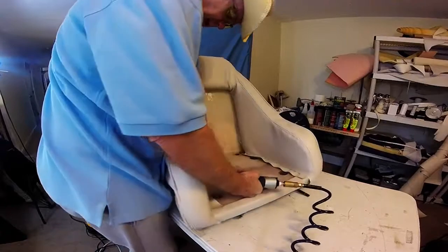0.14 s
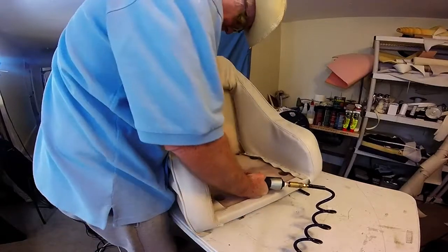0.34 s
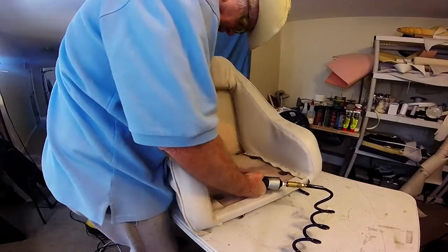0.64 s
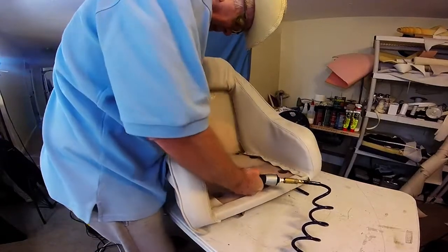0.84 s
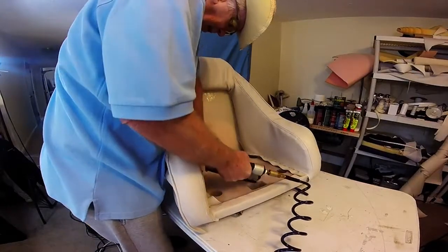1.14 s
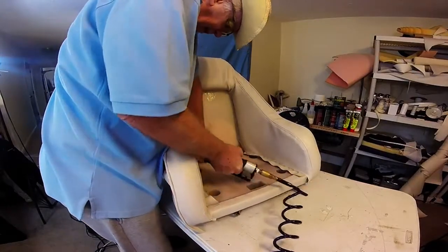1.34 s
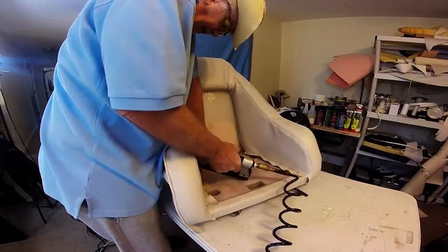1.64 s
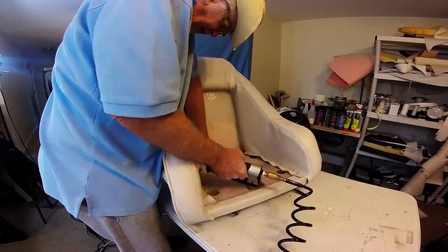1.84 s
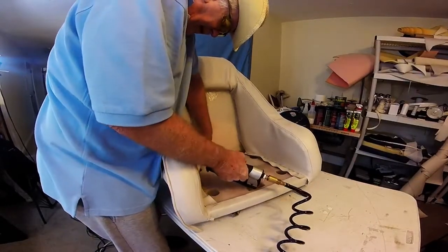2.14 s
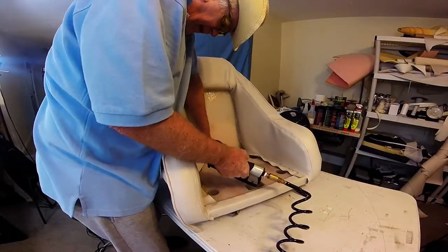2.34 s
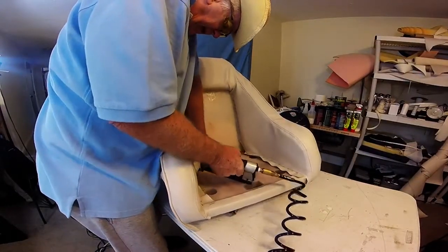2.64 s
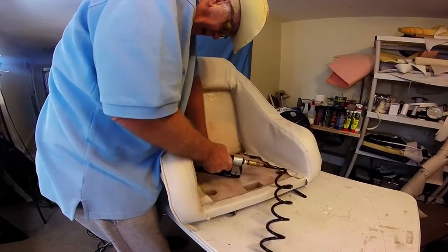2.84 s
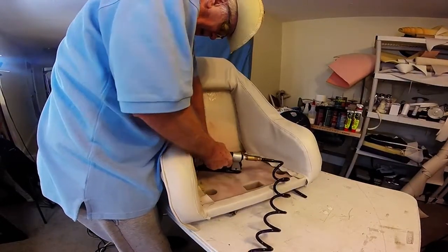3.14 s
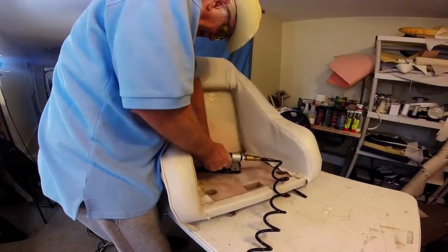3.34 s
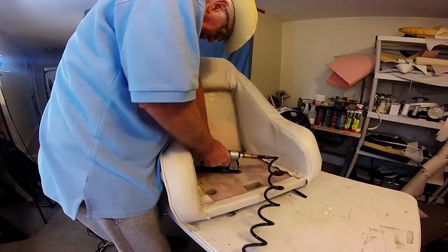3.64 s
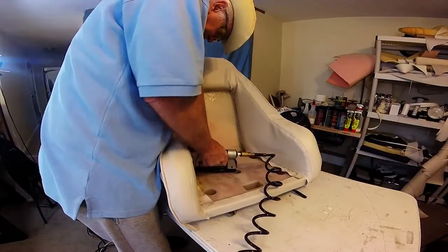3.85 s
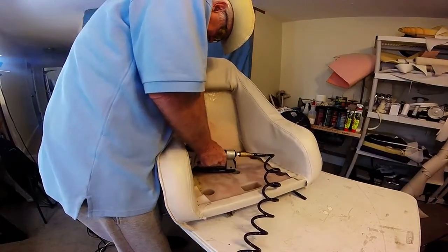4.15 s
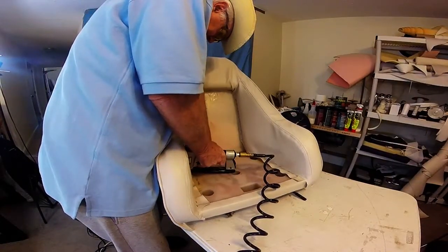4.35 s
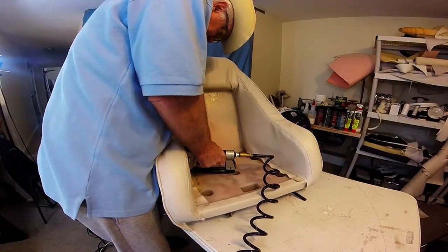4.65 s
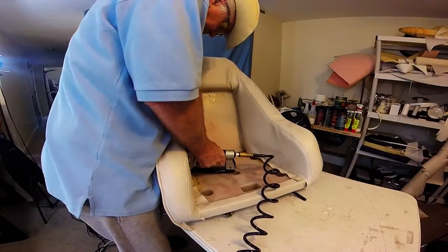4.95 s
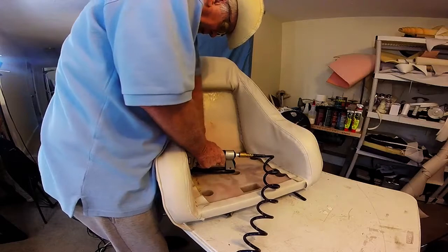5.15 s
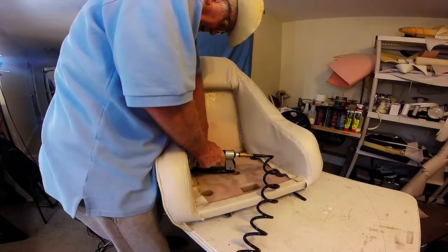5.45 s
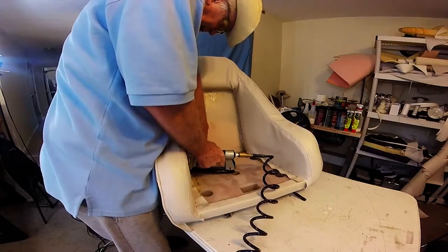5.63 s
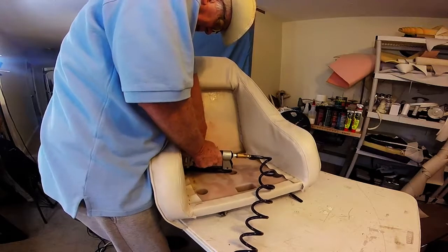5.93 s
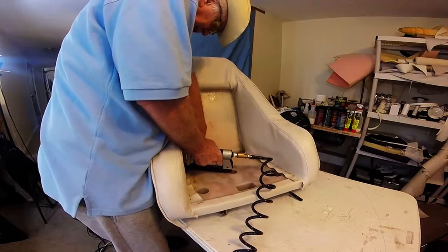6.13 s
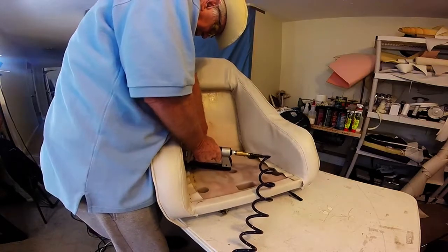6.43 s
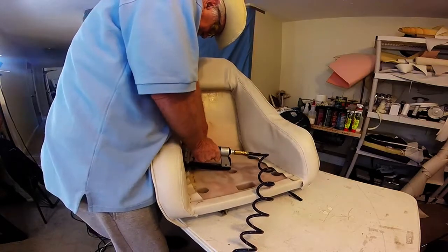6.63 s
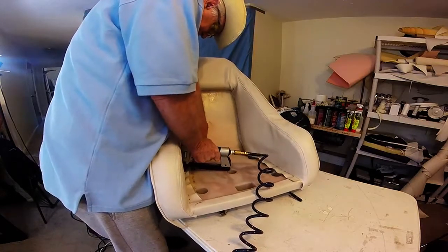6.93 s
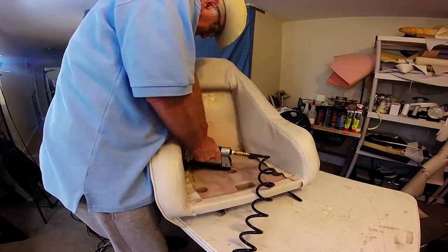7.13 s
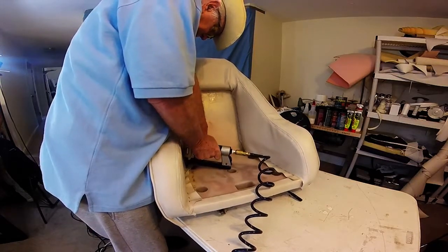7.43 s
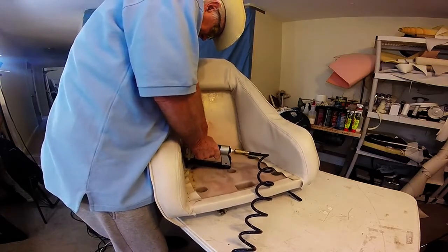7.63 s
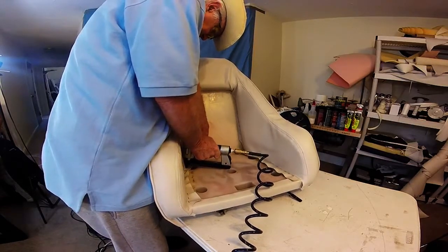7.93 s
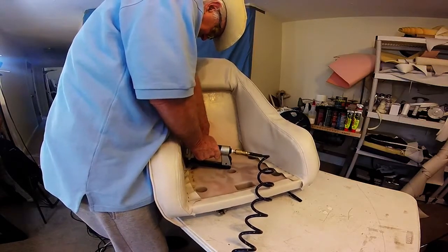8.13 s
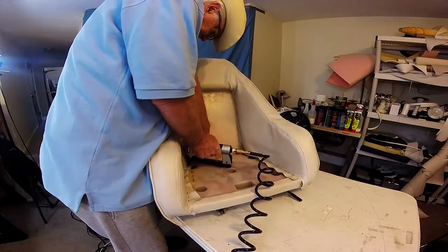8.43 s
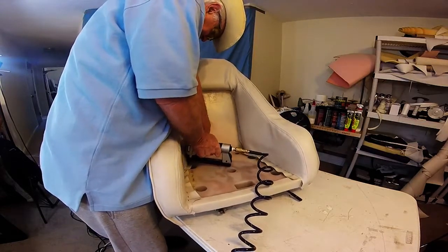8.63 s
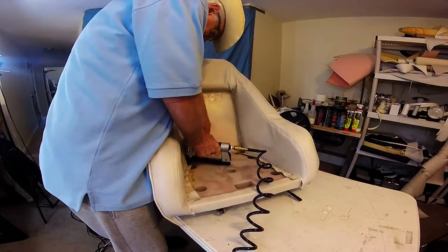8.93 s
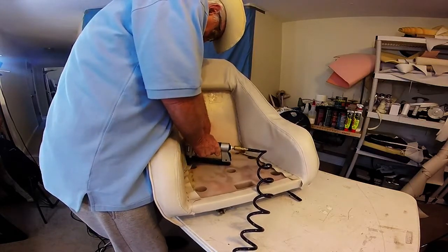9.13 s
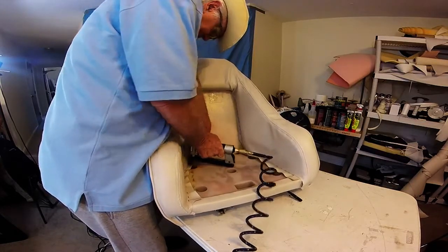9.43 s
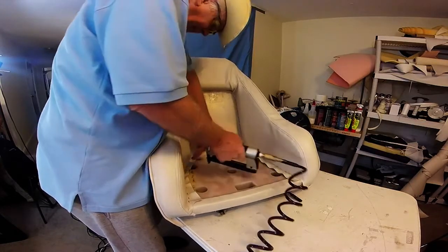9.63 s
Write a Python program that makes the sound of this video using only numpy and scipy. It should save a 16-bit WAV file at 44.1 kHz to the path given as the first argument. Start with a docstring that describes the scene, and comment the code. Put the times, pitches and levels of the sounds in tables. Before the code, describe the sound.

A seat is shoved and bumped on a workbench, then an air stapler fires four hard shots, each followed by a sharp exhaust puff.

```python
"""Small workshop: an air stapler fastens vinyl to a hard plastic seat base.
The seat is shoved into place (stick-slip shudder and scrape); tool and hands bump, clack and rub (struck modes, noise).
Four staples follow: each a hiss at the trigger valve, a driver bang (noise bursts and modes) and, on release,
a puff of exhaust. Random echoes form the room; the overall level drops after each bang and creeps back."""
import sys
import numpy as np
from scipy import signal
from scipy.fft import rfft, irfft
from scipy.io import wavfile
from scipy.ndimage import uniform_filter1d, minimum_filter1d

SR = 44100
rng = np.random.default_rng(int(sys.argv[2]) if len(sys.argv) > 2 else 0)


def unload_audio(sound):
    """Save the sound as a 16-bit wav file, at the path given as the first command line argument."""
    columns = np.transpose(np.atleast_2d(sound))
    # keep every value between -1 and 1, then stretch to whole-number steps
    steps = np.round(np.clip(columns, -1, 1) * 32767)
    wavfile.write(sys.argv[1], SR, steps.astype(np.int16))


N = 431289
TIME = np.arange(N) / SR
AGE = TIME[:SR // 2]  # time since a hit [s]

# All levels are relative: later gains add to them.
# room air: (frequency [Hz], density [dB])
AIR_COLOUR = [(12, -21.5), (20, 7), (87, -8), (124, -23.5), (169, -11), (256, -22), (328, -20.5),
              (445, -20.5), (571, -24.5), (656, -27.5), (841, -25), (1170, -29), (1310, -29.5),
              (12700, -50), (15000, -66)]
# bench rumble under the leaning worker: (frequency [Hz], density [dB])
LEANING_COLOUR = [(15, -20), (35, 1.5), (55, -3.5), (95, -2), (140, -10.5), (300, -34), (2000, -69.5)]
# room decay: (frequency [Hz], t60 [s])
ROOM_T60_S = [(100, 0.16), (400, 0.28), (1000, 0.3147), (3000, 0.2528), (7000, 0.2738), (15000, 0.13)]
# room echo: (frequency [Hz], level [dB])
ROOM_ECHO_DB = [(60, -4.5), (200, -3.5), (500, -8), (1000, -10), (4000, -7.5), (15000, -7.5)]
# the hands work down inside the padded seat, so less of their sound reaches the walls
HANDLING_ECHO_DB, RIM_ECHO_DB = -2.5, -8

# seat shoved along the bench: (start [s], rise [s], shudder [dB], scrape [dB], initial slip rate [1/s])
SHOVES = [(0, 0.026, -24, -31.5, 96), (.29, 0.017, -24, -46, 72)]
SHOVE_S, SLIP_SLOWING_PER_S = 0.38, 0.91
SHUDDER_FADE_DB_PER_S, SCRAPE_FADE_DB_PER_S = 95, 59
# seat scrape and vinyl drag: (frequency [Hz], density [dB])
DRAG_COLOUR = [(120, -37), (200, -7), (329, 3.5), (440, -10.5), (487, 1), (641, -2.5), (951, -10),
               (1620, -30), (12000, -51.5), (15600, -78.5), (22000, -120)]

# how hard the hands work: (time [s], level [dB])
EFFORT = [(0, -54), (2.9, -47), (3.85, -54.5), (4.1, -57), (5.6, -54), (7.5, -54), (8.3, -62.5),
          (9.78, -56)]
# sleeve strokes over the vinyl: (middle [s], length [s], level [dB])
STROKES = [(0.127, 0.37, -45), (0.51, 0.072, -52), (0.804, 0.065, -46), (1.317, 0.14, -54),
           (2.148, 0.085, -62.5), (2.39, 0.12, -56), (2.64, 0.23, -53), (2.805, 0.12, -46),
           (2.87, 0.086, -45), (5.215, 0.24, -46), (6.35, 0.044, -63), (5.843, 0.28, -43),
           (7.748, 0.11, -47), (8.76, 0.18, -55)]
# cloth on vinyl: (frequency [Hz], density [dB])
RUSTLE_COLOUR = [(71, -33), (120, -3), (169, 1.5), (203, -5), (357, -10.5), (446, -11.5), (557, -14.5),
                 (852, -12.5), (1690, -34.5), (3170, -34), (9240, -49), (12500, -54), (15000, -59)]
NUDGES_PER_S = 4.6
# popping fold: (frequency [Hz], density [dB])
CREASE_COLOUR = [(150, -10), (500, -1.5), (1000, 1), (1600, -11.5), (3000, -14.5), (6000, -25),
                 (15000, -42)]
# tool scuffs over taut vinyl: (middle [s], length [s], level [dB])
SCUFFS = [(0.1, 0.23, -59), (1.18, .25, -62.5), (1.462, .42, -63.5), (2.698, 0.37, -65.5),
          (3.232, 0.056, -55), (7.656, 0.05, -59.5), (8.262, .07, -55.5)]
# scuff: (frequency [Hz], density [dB])
SCUFF_COLOUR = [(300, -13), (1000, -2), (2500, 6), (4200, -2), (6000, -2), (10000, -10.5), (13000, -26),
                (16000, -30)]
# ticks of vinyl pulled taut: (time [s], level [dB])
TICKS = [(0.618, -53.5), (0.989, -51.5), (2.242, -57), (3.878, -56), (3.998, -60.5), (6.024, -52.5),
         (6.44, -57), (6.579, -57.5), (7.648, -56.5)]
# dry tick or click: (frequency [Hz], density [dB])
TICK_COLOUR = [(300, -21.5), (1200, 2.5), (3200, 6), (5000, 0), (9000, -9), (13000, -9.5), (16000, -27)]

# tool and hands bump the seat: (time [s], padded thud [dB], shell knock [dB])
BUMPS = [(0.155, -31.5, -35.5), (0.29, -25.5, -39), (0.319, -31, -47), (0.508, -38, -46), (0.622, -41, -50),
         (0.728, -38, -54), (0.8, -48, -49), (0.99, -31.5, -38), (1.069, -17, -39), (1.135, -32, -53),
         (1.344, -42, -54), (1.525, -48, -53), (1.852, -21.5, -38), (1.873, -28, -37), (1.888, -35, -37.5),
         (1.977, -31, -44), (2.043, -42, -68), (2.168, -41, -50), (2.241, -47, -42), (2.479, -20.5, -38.5),
         (2.761, -32, -45), (2.803, -48, -36.5), (2.849, -33, -35.5), (3.001, -41, -51),
         (3.096, -23.5, -34.5), (3.169, -26, -44), (3.735, -39, -30.5), (3.772, -41, -38), (4.13, -49, -49),
         (4.192, -47, -46.5), (4.251, -37.5, -62), (5.237, -41, -62), (5.959, -44, -45), (6.024, -43, -43),
         (6.106, -39, -55), (6.2, -42, -58.5), (6.339, -42, -65), (6.48, -44.5, -64), (6.6, -44, -55),
         (6.722, -43, -60), (7.337, -27.5, -50), (7.651, -31.5, -59), (8.027, -28.5, -31.5),
         (8.393, -30.5, -46), (8.745, -40, -61), (9.656, -34, -54.5), (9.736, -53, -43)]
SETTLE_S, SETTLE_DB = 0.019, -11  # the seat drops back after a bump
# bump through the padding: (frequency [Hz], density [dB])
THUD_COLOUR = [(30, -18), (80, -7), (160, 0), (260, -4), (380, -17), (700, -32), (2000, -58), (8000, -85)]
# short damped tap on the shell: (frequency [Hz], density [dB])
TAP_COLOUR = [(100, -15), (350, -9.5), (650, -1), (850, 3.5), (1150, -5), (1500, -12), (2200, -29),
              (5000, -41), (15000, -56.5)]
# pushes that rock the seat: (time [s], level [dB])
ROCKS = [(0.312, -26.5), (1.07, -25), (1.861, -21), (1.99, -29.5), (2.481, -44), (3.098, -30), (8.742, -35)]
# pushes that flex the plastic base: (time [s], level [dB], settled pitch [Hz])
FLEXES = [(0.29, -32, 304), (0.507, -43, 696), (0.615, -44.5, 814), (1.07, -31, 234), (1.083, -34.5, 285),
          (2.482, -23.5, 204), (3.171, -36, 485), (7.338, -40.5, 443), (8.393, -39.5, 500),
          (8.412, -46.5, 490), (8.752, -59, 380)]
# tool chatters to rest on the shell: (time [s], level [dB])
CHATTER = [(4.839, -34.5), (4.9703, -32), (5.0022, -36), (5.023, -38.5), (5.0444, -42), (5.084, -51)]
# one chattering contact: (frequency [Hz], density [dB])
CHATTER_COLOUR = [(100, -18), (300, -1), (600, 2.5), (1000, 2.5), (1250, -12), (1500, -23), (2000, -30),
                  (4000, -41), (15000, -60)]
# hard, rattling clacks:
# (time [s], clatter [dB], shell knock [dB], metal ring [dB], jingle [dB], click [dB])
CLACKS = [(1.8413, -34, -41, -55, -64, -63), (1.8466, -24, -31, -26.5, -63, -37),
          (3.718, -27, -23, -33, -36.5, -30.5)]
# clatter of a clack: (frequency [Hz], density [dB])
CLATTER_COLOUR = [(100, -2), (200, -25), (400, 3), (700, 4), (1000, 4.5), (1500, -12.5), (2100, -17.5),
                  (3000, -25), (5000, -21), (11000, -29), (15500, -69)]
# tool body knocks on the base rim: (time [s], level [dB], grip damping [ratio], coupling jingle [dB])
RIM_KNOCKS = [(1.946, -38, 1.1, -72), (2.345, -45, 1.2, -72), (2.542, -38, 1.8, -66),
              (2.955, -30, 1.2, -51), (2.964, -36, 0.94, -62), (3.056, -39, 0.66, -68),
              (3.098, -30.5, 0.6, -64), (3.139, -39.5, 0.77, -75), (3.88, -39.5, 0.52, -63),
              (4.2215, -36, 1.4, -55), (4.2287, -36.5, 0.93, -60), (4.2425, -38, 2.3, -61)]

# modes: bench under its weight: (frequency [Hz], level [dB], t60 [s])
BENCH_MODES = [(31.2, -8, 0.52), (44.7, -10, 0.75), (93.4, 6.5, 0.17), (142.4, 1, 0.23)]
# modes: whole padded seat: (frequency [Hz], level [dB], t60 [s])
SEAT_MODES = [(53, -17.5, .17), (93, -13, 0.23), (139, -4.5, 0.11), (163, -3.5, .3), (177.1, -1, .11),
              (205, -4, 0.074), (285, -9, 0.074), (512, -21, 0.12)]
# modes: hard shell of the seat, before hand damping: (frequency [Hz], level [dB], t60 [s])
SHELL_MODES = [(334, -13, .24), (498, -10, .24), (700, -1, .07), (775, 3, .08), (878, 1, .06),
               (966, -2, .09), (1110, -3, .1), (1340, -7, .012), (1490, -16, .024)]
# modes: flexed panel: (multiple of its pitch [ratio], level [dB], t60 [s])
PANEL_MODES = [(.87, -5, 0.076), (1, 5.5, 0.066), (1.14, -6.5, .06)]
# modes: base rim, before grip damping: (frequency [Hz], level [dB], t60 [s])
RIM_MODES = [(727, -2, .075), (800, -6, .06), (878, -1, .07), (965, -3, .06), (1098, 0, .065),
             (1200, -10, .05), (1430, -10, .045), (1841, -25, .04)]
# modes: loose brass hose coupling, before hand damping: (frequency [Hz], level [dB], t60 [s])
COUPLING_MODES = [(2820, -2, .02), (3174, 3, 0.027), (3170, -0.5, 0.022), (3400, -7, 0.024),
                  (3480, -8, 0.017)]
# modes: steel nose and magazine, before hand damping: (frequency [Hz], level [dB], t60 [s])
NOSE_MODES = [(1190, -6, .1), (1303, -5, .12), (1635, 4, .04), (1942, -12, .14), (2253, -4, .11),
              (2417, -5, .14), (2642, -3, .14), (3015, -9, .09), (3353, -10, .13), (5060, -15, .11),
              (6660, -14, .15), (7983, -21, .1)]
# modes: trigger valve and stem, before hand damping: (frequency [Hz], level [dB], t60 [s])
VALVE_MODES = [(1130, -2, 0.039), (3030, -1.5, .04), (3220, 1.5, 0.093), (4500, -8.5, .02),
               (5580, -5.5, .015), (14300, -2, 0.01)]
HAND_DAMPING = 1.9  # decay rate ratio

# staples: (driver lands [s], blow [dB], piston bottoming [dB], leak lead [s], leak [dB], spurt [dB], spurt lead [s])
SHOTS = [(4.5700, -10.5, -3.5, 0.029, -37, -28, 0.013), (6.9080, -10.5, -4.5, 0.036, -34.5, -35.5, 0.0092),
         (7.8333, -16.5, -8, .068, -32, -26, 0.014), (9.2282, -11, -8, 0.04, -33, -34, 0.021)]
SPURT_HALF_S, SHUT_LEAD_S = .0085, .004  # half length; valve sealed this long before landing
BOTTOM_DELAY_S, BOTTOM_REBOUND_S = .003, .0023
SHAKE_DB, SHAKE_DECAY_S, SHAKE_PER_S = -12, .032, 420
# trigger releases: (valve opens [s], exhaust [dB], piston knock [dB], seat boom [dB])
RELEASES = [(4.7245, -18.5, -15, -16), (7.102, -20, -15, -19.5), (7.9961, -24, -20.5, -19),
            (9.3991, -20.5, -16, -20)]
SEEP_S, SEEP_DB, SEEP_SWELL_DB = 0.016, -33, 13  # air seeps ever louder as the finger lets go
# air leaking at the valve: (frequency [Hz], density [dB])
LEAK_COLOUR = [(350, -36.5), (600, -8.5), (1200, -2.5), (1990, -15), (3110, -3.5), (3980, -14), (4810, -11),
               (5660, -8), (11500, -7), (14700, -4.5), (15500, -10)]
# bright edge of an air spurt: (frequency [Hz], density [dB])
SPIT_COLOUR = [(500, -21.5), (4000, -15.5), (8000, -12.5), (12000, 4), (15000, 4)]
# driver bang: (frequency [Hz], density [dB])
BANG_COLOUR = [(60, -29), (130, -12.5), (280, -9.5), (550, -3.5), (780, 1), (1100, -1), (1600, 1),
               (2000, -3), (2800, -2.5), (4000, -23.5), (6700, -28), (11000, -31), (15500, -38.5)]
# piston bottoming out: (frequency [Hz], density [dB])
BOTTOM_COLOUR = [(60, -29.5), (150, -2.5), (300, -5), (550, -5.5), (760, 5.5), (1100, -1), (1500, -6.5),
                 (2000, -13.5), (2800, -7), (4000, -19.5), (6700, -23.5), (15500, -40.5)]
# rattling magazine: (frequency [Hz], density [dB])
MAGAZINE_COLOUR = [(150, -20), (450, -2.5), (1000, 0), (1900, -7), (2700, -2.5), (4000, -8.5), (7000, -10),
                   (15000, -18)]
# magazine and base shaking on: (frequency [Hz], density [dB])
SHAKE_COLOUR = [(100, -9), (170, -1.5), (350, 1.5), (600, 1), (880, 4.5), (1300, 3.5), (1650, -6.5),
                (2000, -2.5), (2600, -6.5), (3300, -5), (4000, -14.5), (5000, -12), (6000, -17.5),
                (6700, -13), (9000, -20.5), (15000, -28.5)]
# exhaust: (frequency [Hz], density [dB])
EXHAUST_COLOUR = [(200, -23.5), (600, 0), (1100, -5.5), (1900, -14), (2600, -8), (4500, -16), (8000, -10.5),
                  (12000, -12.5), (15000, -24)]
# piston knocking home: (frequency [Hz], density [dB])
PISTON_COLOUR = [(80, -16), (170, 1), (330, 0), (550, 1.5), (1100, 5), (1800, -17), (2600, -7),
                 (5000, -19.5), (15000, -18)]

CUT_HZ = 15450


def amp(db):
    """Decibels to gain."""
    return 10 ** (np.asarray(db) / 20)


def unit(x):
    """Scales to rms 1."""
    return x / np.sqrt(np.mean(x ** 2) + 1e-20)


def unit_hit(x, size=441):
    """Scales a hit so that its energy equals rms 1 over 10 ms."""
    return x / np.sqrt(np.sum(x ** 2) / size + 1e-20)


def read(points, hz):
    """Reads a table on a log-frequency axis."""
    f, value = np.transpose(points)
    return np.interp(np.log(hz + 1), np.log(f + 1), value)


def add(mix, s, sound):
    """Lays a sound into the mix at time s."""
    part = mix[max(round(s * SR), 0):][:len(sound)]
    part += sound[:len(part)]


def colour(x, spectrum, size=4096):
    """Causal minimum-phase filter of unit energy; attacks stay sharp."""
    log_gain = np.log(amp(read(spectrum, abs(np.fft.fftfreq(size, 1 / SR)))) + 1e-5)
    response = np.exp(np.conj(signal.hilbert(log_gain)))
    taps = np.fft.ifft(response).real[:size // 2]
    return signal.oaconvolve(x, taps / np.linalg.norm(taps))[:len(x)]


def hiss(spectrum, count):
    """Coloured noise of rms about 1."""
    return colour(rng.standard_normal(count), spectrum)


def wander(knots_per_s):
    """Smooth chance of rms 1: random knots joined by lines."""
    knots = rng.standard_normal(4000)
    return unit(np.interp(TIME * knots_per_s, np.arange(len(knots)), knots))


def ring(modes, rise_s, spread=0.0055, uneven_db=0.5, polarity=None, damping=1, sag=0, sag_s=.01):
    """Dying modes build up over the contact time; force shares vary per blow, soft parts sag in pitch."""
    hz, db, t60_s = np.transpose(modes)[:, :, None]
    detune, share, side = rng.standard_normal((3, len(modes), 1))
    bent_age = AGE + sag * sag_s * (1 - np.exp(-AGE / sag_s))
    swing = np.sin(2 * np.pi * hz * (1 + spread * detune) * bent_age) * (polarity or np.sign(side))
    decay = np.exp(-np.log(1000) * damping * AGE / t60_s)
    contact = 1 - np.exp(-(AGE / rise_s) ** 2)
    return unit_hit(contact * (amp(db + uneven_db * share) * decay * swing).sum(0))


def crack(spectrum, decay_s, rebound_s=0, rebound_db=0):
    """A brief burst of tiny contacts, flattened in spectrum before colouring; it may strike twice."""
    second = (AGE >= rebound_s) * np.exp(-abs(AGE - rebound_s) / decay_s)
    force = np.exp(-AGE / decay_s) + amp(rebound_db) * second
    contacts = rfft(rng.standard_normal(len(AGE)) * force)
    even = irfft(contacts / (abs(contacts) + 1e-20), len(AGE))
    return unit_hit(colour(even * force ** (1 / 4), spectrum))


def rattle(spectrum, decay_s, contacts_per_s):
    """Loose parts touch many times at random, ever more weakly."""
    contacts = (rng.random(len(AGE)) < contacts_per_s / SR) * rng.choice([-1., 1.], len(AGE))
    return unit_hit(colour(contacts * np.exp(-AGE / decay_s), spectrum))


def room_air(level_db=-47, swell_db=1.5):
    """Low rumble and faint hiss of the workshop, slowly wavering."""
    return amp(level_db + swell_db * wander(5.5)) * hiss(AIR_COLOUR, N)


def workshop(x, spacing=8):
    """Dense echoes from walls and shelves; three random patterns slowly crossfade."""
    out = np.zeros(N)
    for k in range(3):
        sparse = (rng.choice([-1., 1.], len(AGE)) * (rng.random(len(AGE)) < 1 / spacing)
                  * (AGE > .004))
        hz, t, z = signal.stft(sparse, SR, nperseg=256)
        z = z * np.exp(-np.log(1000) * t / read(ROOM_T60_S, hz)[:, None])
        norm = np.linalg.norm(signal.istft(z, SR, nperseg=256)[1])
        tail = signal.istft(z * amp(read(ROOM_ECHO_DB, hz))[:, None], SR, nperseg=256)[1] / norm
        weight = np.sqrt(2 / 3) * np.cos(TIME + k * np.pi / 3)
        out += signal.oaconvolve(x * weight, tail)[:N]
    return out


def effort_db(s):
    """How hard the hands work at time s."""
    return np.interp(s, *np.transpose(EFFORT))


def leaning(lumpy_db=4.5):
    """The bench rumbles under the worker's shifting weight."""
    return amp(effort_db(TIME) + lumpy_db * wander(6.8)) * hiss(LEANING_COLOUR, N)


def slide(jitter=0.058, overtone_db=-15.5, grip=0.19):
    """Stick-slip of seat on bench: a low shudder chops a scraping noise, slowing as each shove dies."""
    out = np.zeros(N)
    t = np.arange(0, SHOVE_S, 1 / SR)
    for s, rise_s, shudder_db, scrape_db, slips_per_s in SHOVES:
        hz = slips_per_s * np.exp(-SLIP_SLOWING_PER_S * t) * (1 + jitter * wander(57)[:len(t)])
        angle = 2 * np.pi * np.cumsum(hz) / SR
        coasting_s = np.maximum(t - rise_s, 0)
        slips = unit(np.sin(angle) + amp(overtone_db) * np.sin(2 * angle))
        shudder = amp(shudder_db - SHUDDER_FADE_DB_PER_S * coasting_s) * slips
        scrape = amp(scrape_db - SCRAPE_FADE_DB_PER_S * coasting_s) * hiss(DRAG_COLOUR, len(t))
        scrape = scrape * (1 + grip * np.sin(angle))
        envelope = np.sqrt(np.minimum(t / rise_s, 1)) * (1 - (t / SHOVE_S) ** 4)
        add(out, s, (shudder + scrape) * envelope)
    return out


def rustle(level_db=-2.5, flutter_db=3.0, grains_per_s=70, grain_db=-6.5):
    """Cloth and vinyl rub in uneven strokes, with small creases snapping."""
    level = amp(effort_db(TIME))
    for middle_s, length_s, db in STROKES:
        add(level, middle_s - length_s / 2, amp(db) * np.hanning(round(length_s * SR)))
    snaps = (rng.random(N) < grains_per_s / SR) * rng.standard_normal(N)
    rub = rng.standard_normal(N) * amp(flutter_db * wander(21)) + amp(grain_db) * unit(snaps)
    return amp(level_db) * level * colour(rub, RUSTLE_COLOUR)


def creases(level_db=-9.0, pops_per_s=24, uneven_db=5.0):
    """Folds in the vinyl pop faintly as it is worked over the shell."""
    strength = amp(uneven_db * np.clip(rng.standard_normal(N), -2, 2))
    pops = (rng.random(N) < pops_per_s / SR) * strength
    return amp(effort_db(TIME) + level_db) * colour(unit(pops), CREASE_COLOUR)


def scuffs(slips_per_s=1500):
    """A short swell of tiny slips."""
    out = np.zeros(N)
    for middle_s, length_s, db in SCUFFS:
        slips = (rng.random(len(AGE)) < slips_per_s / SR) * rng.standard_normal(len(AGE))
        stroke = np.hanning(round(length_s * SR))
        noise = unit(colour(slips, SCUFF_COLOUR))[:len(stroke)]
        add(out, middle_s - length_s / 2, amp(db) * stroke * noise)
    return out


def ticks():
    """Taut vinyl lets go with a dry tick."""
    out = np.zeros(N)
    for s, db in TICKS:
        add(out, s, amp(db) * crack(TICK_COLOUR, decay_s=0.017))
    return out


def thud(db, padding_db=-2.0, seat_db=1.0):
    """A push through the padding rocks the whole seat."""
    padding = amp(db + padding_db) * crack(THUD_COLOUR, decay_s=.003)
    seat = ring(SEAT_MODES, rise_s=0.0021, spread=0.018, polarity=1, sag=0.11)
    return padding + amp(db + seat_db) * seat


def knock(db, shell_db=-4.5, tap_db=-4.5, scuff_db=-2.0):
    """A harder touch taps the shell, sets it ringing and scuffs the vinyl."""
    shell = amp(shell_db) * ring(SHELL_MODES, rise_s=0.0023, spread=0.037, damping=HAND_DAMPING)
    tap = amp(tap_db) * crack(TAP_COLOUR, decay_s=0.0048)
    scuff = amp(scuff_db) * crack(DRAG_COLOUR, decay_s=0.02)
    return amp(db) * (shell + tap + scuff)


def nudges(thud_db=4.0, knock_db=-1.5, tick_db=-17.0, uneven_db=2.5):
    """Faint chance touches of fingers and tool, as strong as the hands are busy."""
    out = np.zeros(N)
    for k in range(int(NUDGES_PER_S * N / SR)):
        s = (k + rng.random()) / NUDGES_PER_S
        soft_db, hard_db, dry_db = effort_db(s) + uneven_db * rng.standard_normal(size=3)
        touch = thud(soft_db + thud_db) + knock(hard_db + knock_db)
        add(out, s, touch + amp(dry_db + tick_db) * crack(TICK_COLOUR, decay_s=.01))
    return out


def bumps():
    """Each bump is part thud, part knock; then the seat settles."""
    out = np.zeros(N)
    for s, thud_db, knock_db in BUMPS:
        add(out, s, thud(thud_db) + knock(knock_db))
        add(out, s + SETTLE_S, amp(thud_db + SETTLE_DB) * crack(THUD_COLOUR, decay_s=0.01))
    return out


def rocking():
    """After a heavy push the seat rocks on the bench and rings its low modes."""
    out = np.zeros(N)
    for s, db in ROCKS:
        add(out, s, amp(db) * ring(BENCH_MODES, rise_s=0.0055, spread=.03))
    return out


def flexes():
    """A pushed panel sounds a hollow note that sinks as it relaxes."""
    out = np.zeros(N)
    for s, db, hz in FLEXES:
        modes = np.array(PANEL_MODES) * [hz, 1, 1]
        add(out, s, amp(db) * ring(modes, rise_s=0.0026, spread=0.017, sag=0.14))
    return out


def chatter(thud_db=-5.5, shell_db=-8.0, thud_delay_s=0.0031):
    """The tool touches the shell in hard, dry ticks, and the seat gives a moment later."""
    out = np.zeros(N)
    tick = unit_hit(colour(1. * (AGE == 0), CHATTER_COLOUR))
    for s, db in CHATTER:
        shell = amp(shell_db) * ring(SHELL_MODES, rise_s=0.0036, spread=0.04)
        add(out, s, amp(db) * (tick + shell))
        add(out, s + thud_delay_s, thud(db + thud_db))
    return out


def clacks(shell_db=-1.0, tap_db=-8.5, skitter_db=-5.0):
    """A hard double clatter skitters on; damped shell and metal modes ring briefly, with a click."""
    out = np.zeros(N)
    for s, clatter_db, knock_db, metal_db, jingle_db, click_db in CLACKS:
        clatter = crack(CLATTER_COLOUR, decay_s=0.0038, rebound_s=0.0028, rebound_db=1.5)
        add(out, s, amp(clatter_db) * clatter)
        skitter = rattle(CLATTER_COLOUR, decay_s=0.033, contacts_per_s=600)
        add(out, s, amp(clatter_db + skitter_db) * skitter)
        shell = ring(SHELL_MODES, rise_s=0.0017, spread=0.039, damping=HAND_DAMPING)
        add(out, s, amp(knock_db + shell_db) * shell)
        tap = crack(TAP_COLOUR, decay_s=0.0025, rebound_s=0.0089, rebound_db=2.0)
        add(out, s, amp(knock_db + tap_db) * tap)
        metal = ring(NOSE_MODES[:3], rise_s=0.002, damping=HAND_DAMPING)  # low modes only
        add(out, s, amp(metal_db) * metal)
        jingle = ring(COUPLING_MODES, rise_s=0.0015, spread=0.02, damping=HAND_DAMPING)
        add(out, s, amp(jingle_db) * jingle)
        add(out, s, amp(click_db) * crack(TICK_COLOUR, decay_s=0.023))
    return out


def handling():
    """Sum of the handling sounds, apart from shoves, rim knocks and shots."""
    pushes = bumps() + flexes() + rocking()
    contacts = clacks() + chatter() + ticks() + scuffs()
    return pushes + contacts + creases() + nudges() + rustle()


def rim_knocks():
    """Compact, woody clacks of the tool on the rim; each jogs the hose coupling."""
    out = np.zeros(N)
    for s, db, grip, jingle_db in RIM_KNOCKS:
        add(out, s, amp(db) * ring(RIM_MODES, rise_s=0.0012, spread=.015, damping=grip))
        add(out, s, amp(jingle_db) * ring(COUPLING_MODES, rise_s=0.00073, spread=0.016))
    return out


def trigger_leaks(swell_db=5.5, whistle_db=-4., sputter_db=2, smooth_samples=90):
    """Air sputters past the moving valve, spurts with a bright edge, is sealed off before the driver lands."""
    out = np.zeros(N)
    for s, _, _, lead_s, leak_db, spurt_db, spurt_lead_s in SHOTS:
        t = np.arange(-lead_s, -SHUT_LEAD_S, 1 / SR)
        spurt = amp(spurt_db) * np.exp(-((t + spurt_lead_s) / SPURT_HALF_S) ** 4)
        flow = amp(leak_db + swell_db * np.linspace(-1, 0, len(t))) + spurt
        flutter = unit(uniform_filter1d(rng.standard_normal(len(t)), smooth_samples))
        air = flow * hiss(LEAK_COLOUR, len(t))
        air = air + amp(whistle_db) * spurt * hiss(SPIT_COLOUR, len(t))
        add(out, s - lead_s, amp(sputter_db * flutter) * air * signal.windows.tukey(len(t), .12))
    return out


def valve_knocks(stem_db=-16.0, knock_db=-6.5, ring_db=-9.0, early_s=0.0055):
    """The trigger clicks the valve stem; the main valve jumps off its seat, as hard as the air spurts."""
    out = np.zeros(N)
    for s, _, _, lead_s, leak_db, spurt_db, spurt_lead_s in SHOTS:
        stem = ring(VALVE_MODES, rise_s=.001, spread=.03, damping=HAND_DAMPING)
        add(out, s - lead_s, amp(leak_db + stem_db) * stem)
        jump = amp(knock_db) * crack(PISTON_COLOUR, decay_s=.004)
        valve = ring(VALVE_MODES, rise_s=.0006, spread=0.027, damping=HAND_DAMPING)
        add(out, s - spurt_lead_s - early_s, amp(spurt_db) * (jump + amp(ring_db) * valve))
    return out


def driver_blows(nose_db=-12.5, shell_db=-14.5, clatter_db=-5.5, recoil_delay_s=.013, recoil_db=-16.0):
    """The staple crunches in, the piston bottoms and rings the shell; recoil rattles and shakes the magazine."""
    out = np.zeros(N)
    for s, db, piston_db, *_ in SHOTS:
        bang = crack(BANG_COLOUR, decay_s=0.0042)
        crunch = rattle(BANG_COLOUR, decay_s=0.0055, contacts_per_s=1400)
        add(out, s, amp(db) * (bang + amp(clatter_db) * crunch))
        add(out, s, amp(db + nose_db) * ring(NOSE_MODES, rise_s=0.00065, spread=0.0049))
        bottom = crack(BOTTOM_COLOUR, decay_s=0.0014, rebound_s=BOTTOM_REBOUND_S, rebound_db=-2.0)
        add(out, s + BOTTOM_DELAY_S, amp(piston_db) * bottom)
        shell = ring(SHELL_MODES, rise_s=0.0028)
        add(out, s + BOTTOM_DELAY_S, amp(piston_db + shell_db) * shell)
        magazine = rattle(MAGAZINE_COLOUR, decay_s=0.0064, contacts_per_s=740)
        add(out, s + recoil_delay_s, amp(piston_db + recoil_db) * magazine)
        shake = rattle(SHAKE_COLOUR, decay_s=SHAKE_DECAY_S, contacts_per_s=SHAKE_PER_S)
        add(out, s + recoil_delay_s, amp(piston_db + SHAKE_DB) * shake)
    return out


def exhausts(rise_s=0.0012, hold_s=0.03, fall_s=0.0036, push_db=1.5, push_s=0.00098,
             return_delay_s=0.017, spit_db=-5.5, nose_db=-14.5):
    """The cylinder dumps its air: bright spit, low push, blast of hiss; the piston knocks home."""
    out = np.zeros(N)
    for s, db, knock_db, seat_db in RELEASES:
        count = max(round(SEEP_S * SR), 2)
        seep = amp(SEEP_DB + SEEP_SWELL_DB * np.linspace(-1, 0, count))
        add(out, s - SEEP_S, seep * hiss(LEAK_COLOUR, count))
        flow = (1 - np.exp(-AGE / rise_s)) / (1 + np.exp(np.minimum((AGE - hold_s) / fall_s, 50)))
        add(out, s, amp(db) * flow * hiss(EXHAUST_COLOUR, len(AGE)))
        add(out, s, amp(db + spit_db) * crack(SPIT_COLOUR, decay_s=.005))
        nose = ring(NOSE_MODES, rise_s=0.00088, spread=0.0024)
        add(out, s + return_delay_s, amp(knock_db + nose_db) * nose)
        u = AGE / push_s
        add(out, s, -amp(db + push_db) * unit_hit(u * (2 - u) * np.exp(-u)))
        add(out, s, -amp(seat_db) * ring(SEAT_MODES, rise_s=0.0014, spread=0.063, polarity=1))
        add(out, s + return_delay_s, amp(knock_db) * crack(PISTON_COLOUR, decay_s=0.012))
    return out


def scene():
    """Stapler and seat, direct and through the room; handling sounds drier than the shots."""
    stapler = trigger_leaks() + valve_knocks() + driver_blows() + exhausts()
    hands, rim = handling(), rim_knocks()
    echoes = workshop(stapler + amp(HANDLING_ECHO_DB) * hands + amp(RIM_ECHO_DB) * rim)
    return (stapler + hands + rim + echoes + slide() + leaning() + room_air())[None]


def record(dry, threshold_db=-20.0, slope=0.36, recover_db_per_s=18.5, attack_s=0.0004, hold_samples=22051):
    """Gain drops when the level passes a threshold, holds and creeps back; soft overload; band limit."""
    power = signal.lfilter(np.ones(441) / 441, 1, dry[0] ** 2)  # 10 ms mean
    power_db = 10 * np.log10(power + 1e-12)
    over_db = slope * np.maximum(power_db - threshold_db, 0)
    held_db = -minimum_filter1d(-over_db, hold_samples, origin=hold_samples // 2, mode="constant")
    recovery_db = TIME * recover_db_per_s
    target_db = np.maximum.accumulate(held_db + recovery_db) - recovery_db
    r = np.exp(-1 / (attack_s * SR))
    duck_db = signal.lfilter([1 - r], [1, -r], target_db)
    ducked = dry / amp(duck_db)
    limited = ducked / (1 + ducked ** 4) ** (1 / 4)
    low_pass = signal.firwin(511, CUT_HZ, window=("kaiser", 9), fs=SR)
    return signal.oaconvolve(limited, low_pass[None], "same")


dry = scene()
out = record(dry)
unload_audio(out)
```